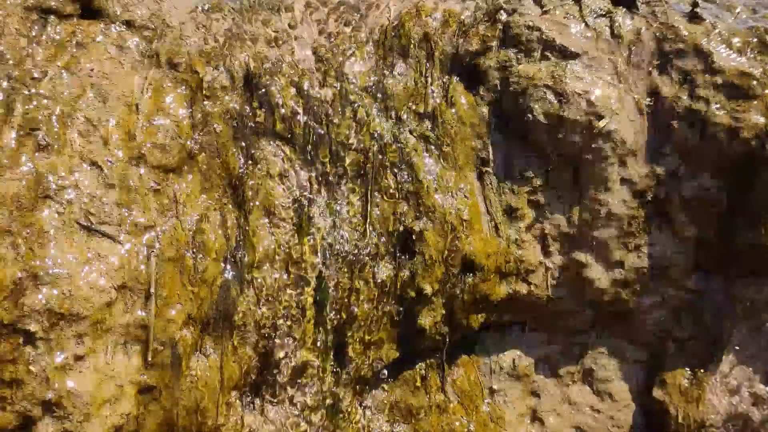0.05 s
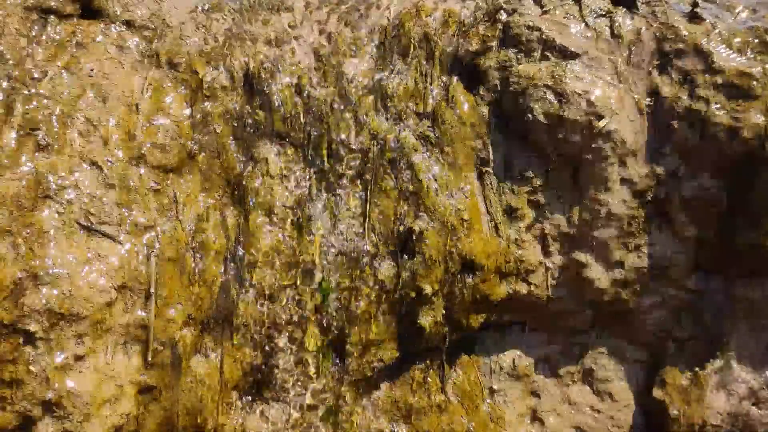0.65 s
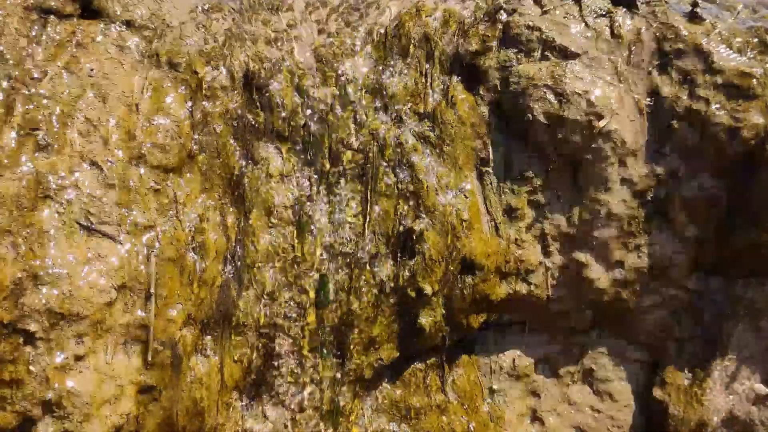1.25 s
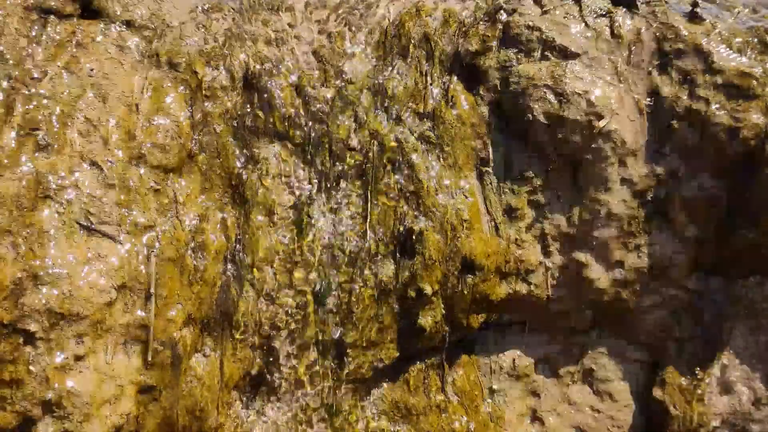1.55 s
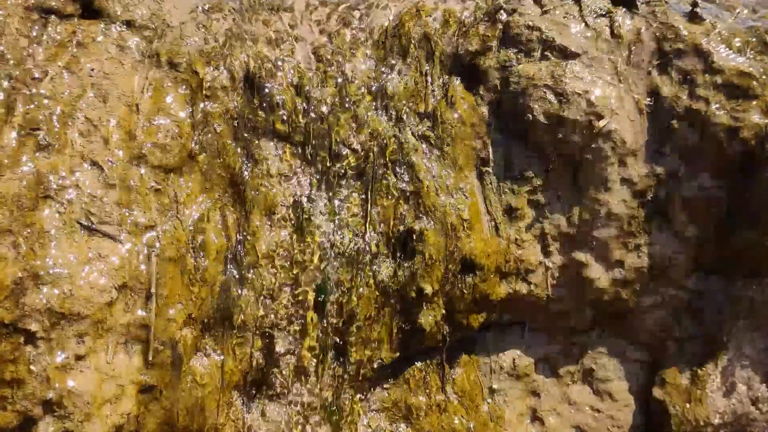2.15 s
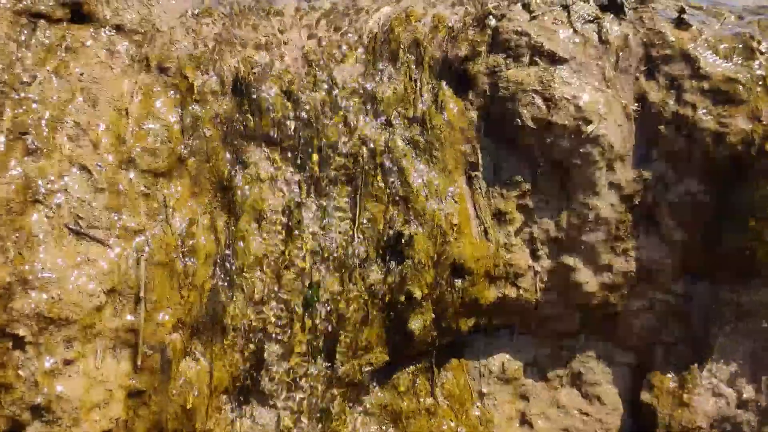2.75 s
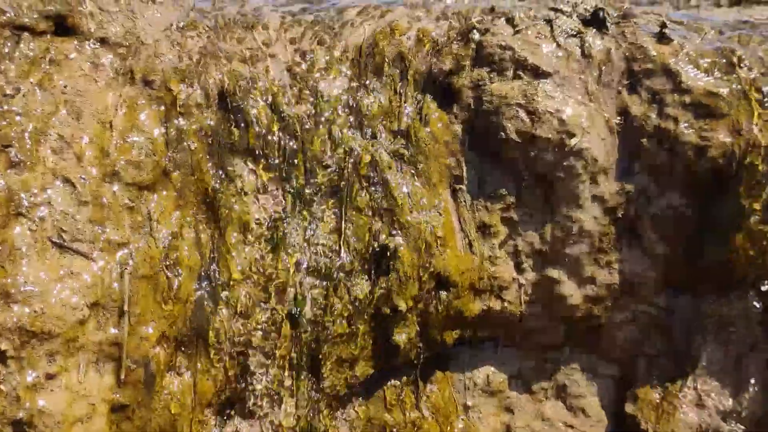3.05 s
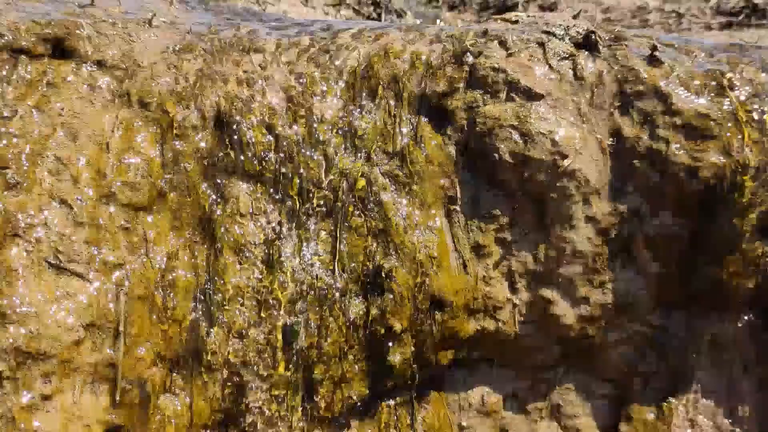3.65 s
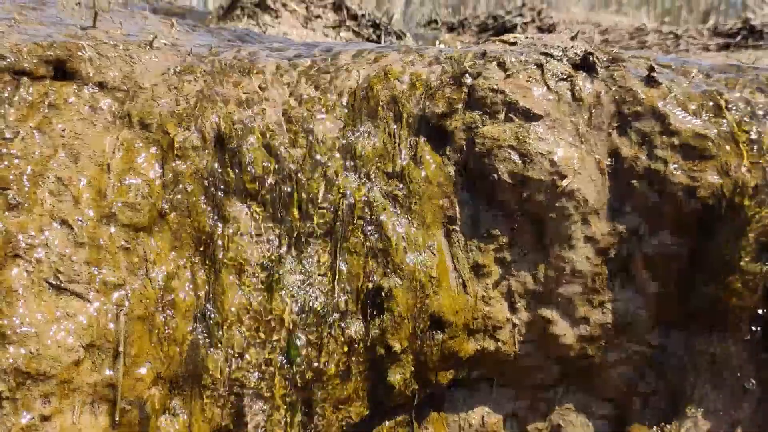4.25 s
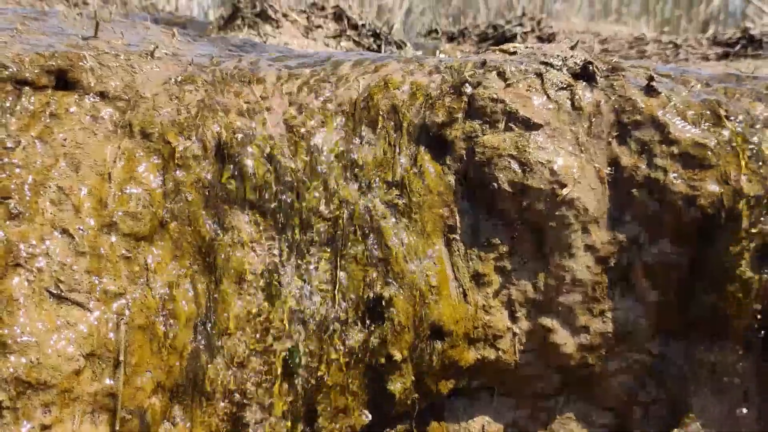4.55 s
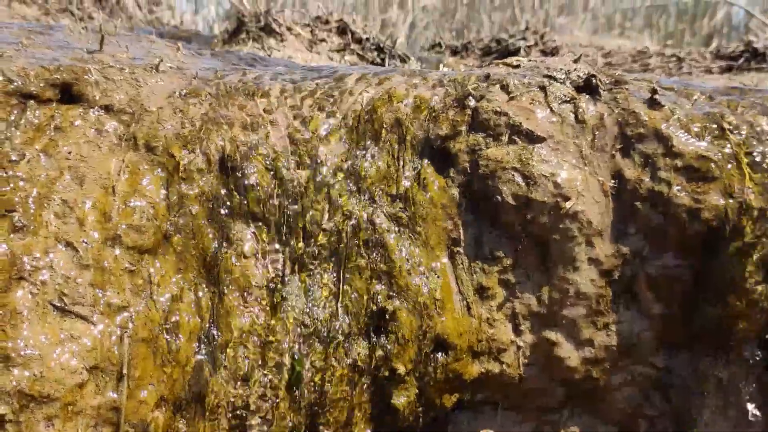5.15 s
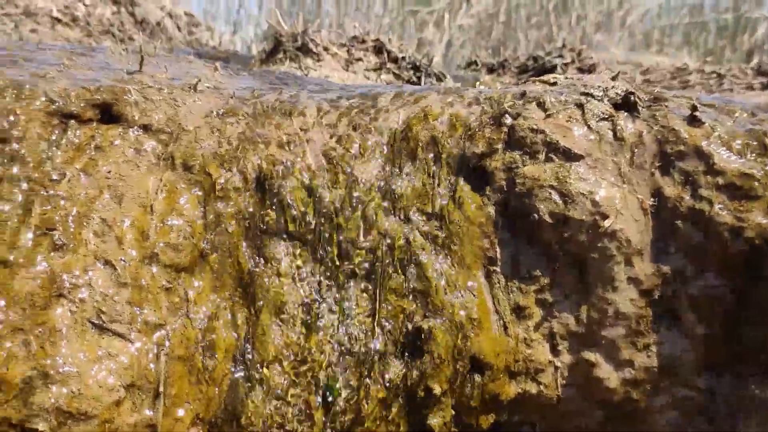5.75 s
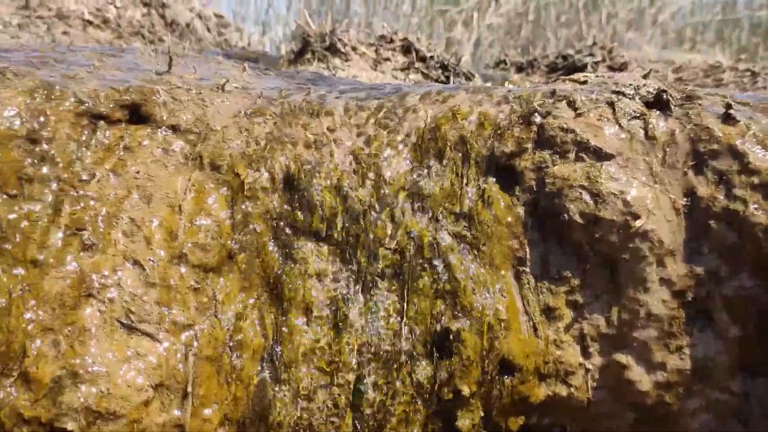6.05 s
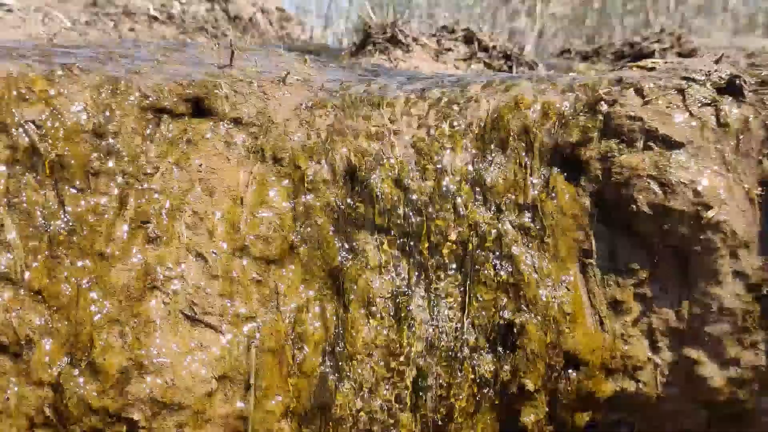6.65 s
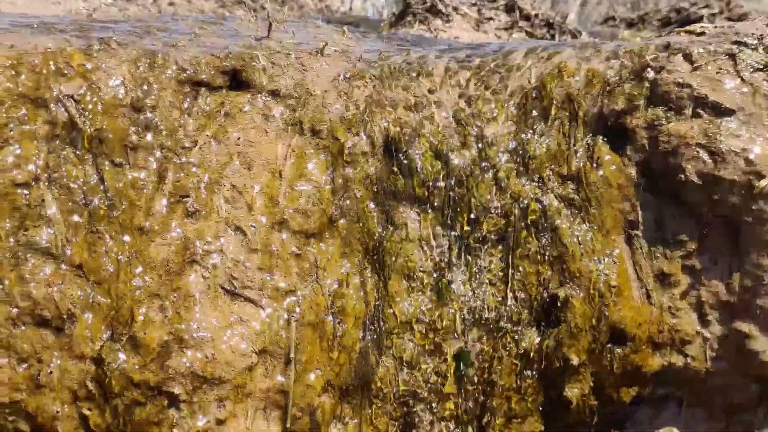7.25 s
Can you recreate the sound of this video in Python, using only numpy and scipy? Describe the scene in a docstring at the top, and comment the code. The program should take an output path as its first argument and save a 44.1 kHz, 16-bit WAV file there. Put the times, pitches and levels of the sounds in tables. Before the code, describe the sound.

Close outdoor trickle of water babbling, dripping and splashing over wet rock, above a faint distant rumble.

```python
"""Outdoors, close to a mossy rock face, a thin fall of water trickles down.
Each big drop traps a bubble that rings for a few cycles and throws a burst of tiny droplets;
others spatter on bare rock. Countless small drops babble and fizz between them, faint glugs come
from the foot of the rock, and froth sizzles near the end. Hollows and ledges add a brief ring,
over a faint distant rumble."""
import sys
import numpy as np
from scipy import signal
from scipy.fft import rfft, irfft
from scipy.io import wavfile
from scipy.ndimage import uniform_filter1d

SR = 44100
rng = np.random.default_rng(int(sys.argv[2]) if len(sys.argv) > 2 else 0)


def digitize_waveform(pressure):
    """Quantize a signal to 16-bit integers and store it at the path in sys.argv[1].

    Rows of a 2-D input are taken as channels; values are limited to [-1, 1].
    """
    field = np.atleast_2d(pressure).T
    bounded = np.clip(field, -1, 1)
    quanta = np.round(bounded * 32767).astype(np.int16)
    wavfile.write(sys.argv[1], SR, quanta)


N = 321930
TIME = np.arange(N) / SR
TOP_HZ = 16050  # ceiling of the treble


def undb(db):
    """Decibels to gain."""
    return 10 ** (np.asarray(db) / 20)


def unit(x):
    """Scale to rms 1."""
    return x / np.sqrt(np.mean(x ** 2))


def along(curve, at):
    """Each further column of a curve, read at given values of its first."""
    axis, *columns = np.transpose(curve)
    return [np.interp(at, axis, column) for column in columns]


def colour(x, points, size=4096):
    """Minimum-phase EQ through (f/Hz, gain/dB) points."""
    hz, db = np.transpose(points)
    grid = np.maximum(np.arange(size // 2 + 1) * SR / size, 1)
    cepstrum = irfft(np.log(undb(np.interp(np.log(grid), np.log(hz), db))))
    cepstrum[1:size // 2] *= 2
    cepstrum[size // 2 + 1:] = 0
    return signal.fftconvolve(x, irfft(np.exp(rfft(cepstrum)))[None], axes=1)[:, :N]


def ride(x, db):
    """Ride the fader so that a texture's running level follows a dB curve."""
    power = uniform_filter1d(np.mean(x ** 2, axis=0), size=9000)
    return x * undb(db) / np.sqrt(np.maximum(power, 1e-18))


# Where the fall stands, brighter when faced: t/s, lead of the left channel/ms, spray f/Hz
BEARING = [(0, 0.07, 4000), (5.9, 0.073, 3070), (6.6, 0.0079, 5180), (7.3, 0.011, 4380)]
def bubbles(s, db, hz, decay_ms, pan_db, swell, scoop_ms, scatter_ms, size):
    """Rings that swell, scoop up to pitch as the cavity closes and die fast; db is taken over 10 ms."""
    scatter, polarity = rng.standard_normal((len(s), 2)).T
    per_ms = SR / 1000
    lead_ms = along(BEARING, s)[0] + scatter_ms * scatter
    start = np.clip(s * SR, 0, N).astype(int)
    index = (start[:, None] + np.arange(size)).ravel()
    rad_per_ms = (2 * np.pi * hz / 1000 * np.sign(polarity))[:, None]
    decay = np.reshape(np.maximum(decay_ms, 0.02), (-1, 1))
    swell = np.reshape(swell, (-1, 1))
    channels = []
    for side in (1, -1):  # left, right
        delay_ms = np.maximum(-side * lead_ms, 0)
        ms = np.maximum(np.arange(size) / per_ms - delay_ms[:, None], 0)
        tone = np.sin(rad_per_ms * (ms - scoop_ms * (1 - np.exp(-2 * ms))))
        ring = (ms / decay) ** swell * np.exp(-np.minimum(ms / decay, 20)) * tone
        pan_gain = np.sqrt(2 / (1 + undb(-2 * side * pan_db)))
        gain = undb(db) * pan_gain * np.sqrt(10 * per_ms / (np.sum(ring ** 2, axis=1) + 1e-12))
        channels.append(np.bincount(index, (ring * gain[:, None]).ravel(), N + size)[:N])
    return np.array(channels)


def spray(s, db, hz, pan_db, spread_s, octaves, cycles, count):
    """Each impact throws a burst of pinging droplets that builds and thins within milliseconds."""
    late, pitch, loud, aside = np.moveaxis(rng.standard_normal((len(s), count, 4)), 2, 0)
    onsets = s[:, None] + spread_s * (0.3 + 0.48 * late + 0.08 * late ** 2)
    weight = undb(2 * loud - 4.5 * np.abs(late))
    weight /= np.sqrt(np.sum(weight ** 2, axis=1, keepdims=True))
    ping_db = db[:, None] + 20 * np.log10(weight)
    ping_pan_db = pan_db[:, None] + 4 * aside
    ping_hz = hz[:, None] * 2 ** (octaves * pitch)
    # droplet sizes are bounded: stray pitches fold back, and only the finest bursts reach the top
    top_hz = np.clip(1.6 * hz, 10500, TOP_HZ)[:, None]
    ping_hz = np.clip(ping_hz, 1200 ** 2 / ping_hz, top_hz ** 2 / ping_hz).ravel()
    decay_ms = np.minimum(1000 * cycles / ping_hz, 0.32)
    return bubbles(onsets.ravel(), ping_db.ravel(), ping_hz, decay_ms, ping_pan_db.ravel(),
                   swell=2, scoop_ms=0.044, scatter_ms=0.028, size=124)


def film(droplets, steady_db, window_s):
    """Hiss of the water sheet, which rises and falls around each burst of droplets."""
    power = uniform_filter1d(np.mean(droplets ** 2, axis=0), size=int(window_s * SR))
    stirred = np.sqrt(np.maximum(uniform_filter1d(power, size=200), 0))
    return rng.standard_normal((2, N)) * (stirred + undb(steady_db)) * undb([[1.2], [-1.2]])


# Hero drops: t/s, relative plop level/dB, bubble f/Hz, decay/ms, relative splash level/dB
DROP_HITS = [(0.003, -44, 1030, 0.31, -44.5), (0.0308, -62, 1630, 0.44, -45),
             (0.0754, -39.5, 3270, 0.3, -33.5), (0.114, -46, 2520, 0.27, -48),
             (0.128, -51, 1750, 0.94, -44), (0.1497, -48, 2700, .35, -60), (0.159, -48, 1520, 0.67, -57),
             (0.171, -47.5, 2920, 0.26, -45), (0.236, -51.5, 1430, 0.48, -46),
             (0.2402, -50.5, 2000, 0.27, -45), (0.273, -52, 3080, 0.51, -36),
             (0.3474, -47.5, 2300, 0.69, -41), (0.373, -53.5, 1720, 1, -57), (0.455, -55, 1700, 0.41, -45),
             (0.467, -61, 1770, 0.34, -40.5), (0.517, -48, 4000, 0.15, -62), (0.555, -45, 2920, 0.43, -38),
             (0.677, -42.5, 1390, 0.84, -39), (0.708, -46.5, 3060, 0.5, -66), (0.794, -54, 2480, 0.17, -43),
             (0.8136, -46, 1360, 0.68, -41), (0.8347, -53.5, 1540, 0.55, -49), (0.883, -43, 1446, 1.2, -43),
             (0.912, -53, 2240, 0.7, -63), (0.9363, -51, 2770, 0.29, -48), (0.9783, -54, 1620, 0.4, -47),
             (0.998, -55, 2750, 0.21, -48), (1.2058, -54, 3140, 0.56, -42),
             (1.2287, -51.5, 1240, 0.37, -44), (1.3718, -51, 2500, 0.48, -42), (1.38, -55, 1750, 0.19, -37),
             (1.4063, -56, 1790, 0.32, -48), (1.43, -52, 2770, .28, -52), (1.446, -50.5, 2780, 0.41, -44),
             (1.465, -48.5, 2270, 0.18, -44), (1.5051, -41, 2040, 0.18, -35.5),
             (1.532, -51, 1200, 0.67, -64), (1.5528, -61, 3080, .3, -38), (1.5944, -46.5, 2520, 0.6, -39),
             (1.6161, -47.5, 1300, 0.48, -73), (1.693, -54.5, 1470, 0.65, -42),
             (1.716, -53, 2440, 0.83, -44), (1.735, -53, 2550, .35, -41), (1.784, -44, 5350, 0.48, -37),
             (1.788, -47, 2450, 0.37, -42), (1.8229, -54, 1560, 0.3, -37.5), (1.87, -51.5, 3100, 0.26, -37),
             (1.9417, -53, 4540, 0.42, -48), (1.968, -50, 2470, 0.9, -45), (1.982, -54, 1450, .7, -49),
             (1.9863, -52, 1380, 0.86, -55), (2.0186, -42.5, 2200, 0.18, -52),
             (2.0528, -53, 2280, 0.43, -43), (2.204, -58, 2370, .5, -47), (2.2488, -58, 2860, .38, -40),
             (2.279, -51, 2270, 0.92, -37.5), (2.3199, -46, 1500, 0.43, -43),
             (2.329, -47.5, 2440, 0.6, -56), (2.351, -54.5, 1550, .4, -54),
             (2.3597, -53.5, 1590, 0.43, -41), (2.4382, -41, 3100, 0.38, -38),
             (2.442, -49.5, 2350, .6, -52), (2.5925, -49.5, 1670, 0.45, -52), (2.6045, -55, 2390, .45, -44),
             (2.659, -45, 2240, 0.18, -40), (2.701, -50, 1470, 0.77, -35.5), (2.7103, -57, 1660, 0.45, -38),
             (2.7412, -51.5, 1440, 0.27, -56), (2.7897, -39, 1450, 0.64, -62),
             (2.812, -56, 1560, 0.93, -37.5), (2.8385, -46.5, 1210, 0.56, -42),
             (2.8404, -42.5, 1480, 0.43, -40), (2.8585, -55, 1710, 0.75, -41),
             (2.869, -44.5, 1530, 0.72, -45), (2.9114, -48.5, 3800, 0.41, -51),
             (2.929, -49, 2960, 0.35, -40), (2.955, -50, 1980, 0.29, -46), (3.06, -41, 1536, 0.67, -41.5),
             (3.1105, -53.5, 1600, 0.65, -53), (3.148, -50.5, 2350, .45, -57),
             (3.1982, -44.5, 1520, 0.51, -60), (3.2405, -46.5, 2280, 0.49, -43),
             (3.284, -47.5, 4000, 0.42, -60), (3.3282, -56.5, 890, 0.52, -42),
             (3.3865, -51.5, 1680, 0.51, -47), (3.415, -52, 2430, 0.4, -41), (3.428, -56, 1530, .65, -41),
             (3.467, -47, 1690, 0.49, -68), (3.503, -58, 2500, 0.52, -35.5),
             (3.5224, -47.5, 1260, 0.94, -34.5), (3.562, -47, 2450, 0.22, -52),
             (3.582, -49.5, 2390, 0.89, -41), (3.6034, -46, 1130, 1.3, -76), (3.6236, -35, 2050, 0.3, -40),
             (3.666, -44, 3300, 0.46, -61), (3.7179, -44.5, 3400, 0.31, -38.5),
             (3.742, -45, 2900, 0.13, -43), (3.829, -45, 1330, 0.66, -35),
             (3.8723, -43.5, 1970, 0.31, -38.5), (3.883, -53, 1530, 0.8, -51),
             (3.9152, -45.5, 3260, 0.26, -40), (3.926, -48.5, 2210, 0.66, -54),
             (3.9474, -37.5, 2120, 0.25, -33), (3.9763, -47, 1760, 0.54, -57),
             (3.998, -48, 1330, 0.37, -59), (4.0235, -47.5, 1660, 1.3, -40),
             (4.045, -46.5, 2000, 0.32, -44), (4.0833, -51, 1230, 0.78, -37.5),
             (4.103, -44.5, 1670, 0.55, -47), (4.1103, -47.5, 1150, 0.65, -58),
             (4.1276, -47.5, 1360, 0.47, -36), (4.184, -44.5, 3180, 0.21, -48), (4.199, -54, 1580, .5, -35),
             (4.2178, -39, 1660, 0.47, -34), (4.2297, -54, 1550, 0.46, -35.5),
             (4.2486, -49.5, 1420, 0.59, -46), (4.2652, -43.5, 2190, 0.11, -37),
             (4.2707, -42, 3200, 0.32, -40), (4.2832, -46, 1360, 0.7, -57),
             (4.348, -47.5, 4000, 0.2, -41.5), (4.365, -52.5, 3210, 0.31, -59),
             (4.4015, -44.5, 1380, 0.39, -39.5), (4.434, -47, 1580, 0.38, -55),
             (4.4645, -46.5, 3320, 0.35, -57), (4.475, -46.5, 1840, 0.23, -46),
             (4.4855, -40.5, 1280, 0.68, -37), (4.5142, -42.5, 1180, 0.8, -34),
             (4.5155, -48, 710, 0.93, -52), (4.5327, -46.5, 3300, 0.57, -38),
             (4.5633, -42.5, 3400, 0.23, -57), (4.5792, -37.5, 4760, 0.19, -38),
             (4.588, -45, 1100, 1.5, -57), (4.6148, -37.5, 3050, 0.39, -45),
             (4.6225, -48.5, 1750, 0.6, -57), (4.646, -50, 3230, 0.21, -56), (4.684, -55.5, 960, 0.67, -63),
             (4.7032, -51.5, 1630, 0.76, -38), (4.7634, -49.5, 2000, 0.33, -37),
             (4.7983, -49.5, 1350, 0.74, -37), (4.8468, -46.5, 4740, 0.29, -64),
             (4.8694, -37.5, 3155, 0.44, -35.5), (4.894, -45, 1580, 0.35, -46),
             (4.917, -40, 1050, 0.32, -42), (4.9395, -51.5, 1630, 0.24, -45),
             (5.0793, -47, 3760, 0.39, -41), (5.0928, -40, 1180, 0.57, -44), (5.1155, -47, 1480, 0.35, -59),
             (5.2075, -51.5, 1560, 0.65, -65), (5.2356, -52.5, 1580, 1.1, -58),
             (5.2815, -50, 1340, 0.53, -60), (5.351, -49, 2570, 0.23, -48), (5.3706, -50, 2370, 0.34, -47),
             (5.395, -51, 2860, 0.72, -44), (5.4205, -51.5, 1485, 0.45, -59), (5.466, -54, 1410, 0.82, -64),
             (5.5242, -44, 1210, 1.6, -41), (5.5535, -42, 4460, 0.15, -47),
             (5.6031, -39.5, 1444, 0.61, -44), (5.613, -49.5, 2970, 0.51, -57),
             (5.635, -56, 1620, 0.89, -41), (5.658, -53, 3160, 0.49, -49), (5.6694, -53, 1450, 1.5, -42),
             (5.697, -48.5, 1500, 0.58, -41), (5.7561, -54, 1850, 0.92, -64),
             (5.7949, -46, 1210, 0.54, -41), (5.797, -44, 3270, 0.2, -57), (5.8, -52, 2480, 0.17, -42.5),
             (5.8339, -50.5, 1600, 0.34, -52), (5.974, -48, 3000, 0.13, -44),
             (6.0145, -46.5, 1360, 0.53, -39.5), (6.0414, -52, 4070, 0.32, -43),
             (6.0705, -54.5, 1840, 0.39, -39), (6.1903, -45.5, 1920, 0.47, -45),
             (6.197, -49, 1630, 0.9, -47), (6.2247, -56, 1660, 1.3, -42), (6.2586, -52, 4300, 0.4, -52),
             (6.2769, -47, 2300, 0.81, -39.5), (6.293, -47.5, 3530, 0.41, -53),
             (6.3, -45.5, 3000, 0.29, -42), (6.3156, -46.5, 4500, 0.25, -58), (6.392, -49, 3560, 0.32, -40),
             (6.4228, -39.5, 3850, 0.17, -61), (6.451, -53.5, 1360, 0.66, -39.5),
             (6.482, -57, 1840, 0.29, -40.5), (6.5036, -54, 2450, 0.31, -35.5),
             (6.552, -52, 880, 0.41, -73), (6.6375, -49.5, 1660, 0.87, -36.5),
             (6.702, -47, 4400, 0.42, -37.5), (6.7154, -51, 2656, 0.26, -42),
             (6.7368, -47.5, 3600, 0.25, -42), (6.7696, -51, 1090, 0.45, -57),
             (6.7892, -49.5, 3250, 0.3, -59), (6.803, -43, 3600, 0.35, -31), (6.887, -57, 1800, 0.24, -54),
             (6.903, -53, 3400, 0.37, -58), (6.9135, -57, 1618, 1, -68), (6.922, -49, 3700, 0.33, -59),
             (6.935, -47, 2410, 0.73, -34.5), (6.9799, -44, 1735, 0.77, -38), (7.0207, -46, 2050, .27, -56),
             (7.0324, -49, 4450, 0.35, -51), (7.07, -44.5, 1660, 0.68, -33), (7.0923, -46, 3300, 0.51, -64),
             (7.0993, -49, 1460, 0.27, -62), (7.111, -58, 4330, 0.42, -50), (7.123, -44.5, 3370, 0.39, -39),
             (7.1788, -44, 4500, 0.36, -49), (7.184, -53.5, 1480, 0.96, -61), (7.214, -37, 4050, 0.27, -33),
             (7.228, -42, 5450, 0.14, -33), (7.253, -53, 3640, 0.28, -45), (7.2655, -46, 2920, 0.48, -52)]
# Deep bubbles sit centre, smaller ones to the left: f/Hz, left minus right/dB
DROP_PANNING = [(1000, 0.5), (1600, 0.5), (2500, 3), (3200, 3), (4500, 1)]
# EQ of the water sheet torn by a big drop: f/Hz, gain/dB
SHEET_EQ = [(500, -17.5), (1400, -14), (3500, -4), (6000, -25.5), (9000, -4), (11000, -15.5), (16000, -19)]
def big_drops():
    """Plops in the water film, each with its splash; small, high bubbles have a softer attack."""
    s, db, hz, decay_ms, spray_db = np.transpose(DROP_HITS)
    pan_db = along(DROP_PANNING, hz)[0] + 1.05 * rng.standard_normal(len(s))
    spray_hz = along(BEARING, s)[1] * 2 ** (0.2 * rng.standard_normal(len(s)))
    swell = np.interp(hz, [1500, 3000], [1.5, 3])
    plops = bubbles(s, db, hz, np.maximum(decay_ms, 0.15), pan_db, swell,
                    scoop_ms=0.13, scatter_ms=0.048, size=700)
    splash = spray(s, spray_db, spray_hz, pan_db / 2 + 0.5,
                   spread_s=0.0042, octaves=0.651, cycles=1.16, count=26)
    sheet = colour(film(splash, steady_db=-50.5, window_s=0.0016), SHEET_EQ)
    return undb(5.5) * plops + undb(-4.5) * splash + undb(-3.5) * sheet


# Fader moves of the trickle, before trims: t/s, babble level/dB, fizz level/dB, mist level/dB
FLOW_FADERS = [(0, -46.5, -54, -61), (0.5, -52.5, -52, -58.2), (0.85, -52, -55.5, -60),
               (1.15, -49.5, -54, -58), (1.5, -49.5, -55.5, -61.5), (1.9, -51.5, -51, -58.5),
               (2.25, -48, -52.5, -63), (2.55, -53, -50.5, -59), (2.8, -49.5, -56, -62),
               (2.95, -51, -53, -53), (3.12, -52, -53.5, -58), (3.29, -50.5, -49.5, -46.5),
               (3.38, -49, -50.5, -61), (3.55, -51, -55.5, -61.5), (3.77, -50, -51.5, -58),
               (4.0, -45.5, -53, -56.5), (4.38, -50.5, -52, -60.5), (4.55, -46.5, -49.5, -56.5),
               (4.75, -49.5, -55.5, -62.5), (5.15, -50, -56.5, -59), (5.65, -48, -56, -61),
               (5.9, -48, -55, -61.5), (6.15, -51.5, -51.5, -59.5), (6.5, -52.5, -54.5, -60.5),
               (7.3, -52, -49.5, -62)]
# EQs of the trickle's layers: f/Hz, gain/dB
BABBLE_EQ = [(300, -14.5), (600, 19.5), (850, -5.5), (1150, 3.5), (1550, 4.5), (1880, 4.5), (2380, 9),
             (2750, 7.5), (3150, 9.5), (3900, 5.5), (5500, 15.5), (9000, -8)]  # bubbles of the small drops
PLINK_EQ = [(1500, -11), (3000, 4), (5000, 8), (6500, -17.5), (9000, 8), (10800, -10), (13000, -13),
            (16000, -44)]  # tiny bubbles ringing on their own
FIZZ_EQ = [(500, 12.5), (1500, -6), (3000, -11), (5000, 1), (6500, 4.5), (8500, 2.5), (9800, -29),
           (10800, -7), (12500, -31)]  # shed droplets
MIST_EQ = [(5000, -69), (9500, 10), (11500, -2.5), (13000, -10), (15300, 1.5), (16500, -13)]  # atomised water
CHURN_EQ = [(400, -31), (900, -12), (1400, -8.5), (2500, -5.5), (3500, -8), (6000, -15.5), (12000, -34)]  # stirred water that fills the gaps
def trickle(count=1700):
    """Small drops at random: each rings a bubble and sheds fizz and mist, over the hiss of the film."""
    babble_db, fizz_db, mist_db = along(FLOW_FADERS, TIME)
    place, pitch, force, tiny = rng.random((count, 4)).T
    ring, aside, trapped, fine, lag = rng.standard_normal((count, 5)).T
    s = (np.arange(count) + 4 * place - 2) / count * N / SR
    db = 15 * force ** 2  # many weak drops, few strong ones
    hz = 1150 * 4 ** pitch ** 1.2
    pan_db = 3 * aside + np.where(hz > 1900, 4, -1.5)
    decay_ms = 0.56 * np.exp(0.057 * ring) * (hz / 2000) ** -0.4
    babble = bubbles(s, 0.77 * db + 2 * trapped, hz, decay_ms, pan_db,
                     swell=3, scoop_ms=0.2, scatter_ms=0.039, size=480)
    # a drop splits into several smaller bubbles
    babble += undb(-8.5) * spray(s, 1.48 * db, 2300 * 2 ** (0.21 * fine), pan_db,
                                 spread_s=0.0054, octaves=0.75, cycles=0.72, count=4)
    # and leaves a tiny one that rings with a clear pitch
    plinks = bubbles(s + 0.002 * lag, db - 2 * trapped, 3000 * 5 ** tiny, 0.26 * np.exp(0.22 * ring),
                     pan_db=3.5 - 4 * aside, swell=3, scoop_ms=0.14, scatter_ms=0.014, size=260)
    droplets = unit(spray(s, db, 7000 * 2 ** (0.5 * fine), 3 * aside + 5.4,
                          spread_s=0.0028, octaves=0.27, cycles=1.94, count=9))
    droplets += undb(-9.5) * film(droplets, steady_db=-25, window_s=0.0025)
    fizz = unit(colour(droplets, FIZZ_EQ)) + undb(-2.5) * unit(colour(plinks, PLINK_EQ))
    # the hardest impacts atomise the most water
    mist = unit(spray(s, 1.04 * db + 2 * fine, np.full(count, 13000), 3 * aside + 3.8,
                      spread_s=0.0023, octaves=0.16, cycles=1.6, count=6))
    churn = film(unit(babble), steady_db=8.5, window_s=0.0025)
    mist += undb(-20) * film(mist, steady_db=1, window_s=0.0032)
    return (ride(colour(babble, BABBLE_EQ), babble_db - 2.5)
            + ride(colour(churn, CHURN_EQ), babble_db - 8.5)
            + ride(fizz, fizz_db + 0.24)
            + ride(colour(mist, MIST_EQ), mist_db + 0.18))


# Accents on bare rock: t/s, relative level/dB, droplet f/Hz
SPATTER_HITS = [(0.274, -31.5, 7100), (0.312, -29, 7960), (0.3305, -40, 9200), (0.336, -35, 7500),
                (0.4555, -34, 6400), (0.472, -35, 6360), (0.553, -34, 10100), (0.5732, -35.5, 8900),
                (0.5825, -34, 8100), (0.832, -42, 11400), (0.943, -34, 7300), (0.9692, -35.5, 7360),
                (0.983, -40, 12900), (1.044, -42, 12500), (1.1, -40, 12700), (1.381, -37, 6500),
                (1.785, -37, 5700), (2.1185, -33.5, 5930), (2.192, -41.5, 11500), (2.47, -37, 10000),
                (2.596, -36.5, 12400), (2.6438, -35, 11000), (2.813, -40, 12700), (2.8515, -31, 7950),
                (2.869, -34, 10500), (2.888, -31.5, 9500), (2.93, -29, 6270), (2.964, -38, 12500),
                (2.986, -41, 13000), (3.018, -29, 5800), (3.061, -45, 12200), (3.1995, -35, 8550),
                (3.238, -48, 12500), (3.2535, -33, 12700), (3.2916, -37, 10200), (3.3067, -32.5, 6500),
                (3.3183, -33, 7300), (3.5011, -31, 6200), (3.519, -40, 11500), (3.849, -37.5, 6740),
                (3.8835, -34, 7500), (4.58, -33, 6300), (4.8485, -34, 6900), (5.0243, -34, 8600),
                (5.081, -31, 7950), (5.216, -30.5, 9050), (5.4297, -33.5, 9000), (5.555, -41, 11000),
                (5.943, -34, 7200), (6.138, -33, 7050), (6.52, -37, 6440), (6.565, -35, 6560),
                (6.601, -33, 6350), (6.749, -30, 6900), (6.898, -36, 7100), (6.921, -33.5, 5200),
                (6.9505, -30.5, 7540), (6.981, -35.5, 9800), (7.137, -36, 6850), (7.1555, -31, 5200),
                (7.1705, -29, 5750), (7.195, -40, 5000)]
def spatters(fills=44):
    """Drops burst bright and dry with no big bubble; weaker random fills follow the fizz fader."""
    weak, place, pitch = rng.random((fills, 3)).T
    fill_s = (np.arange(fills) + place) / fills * N / SR
    fill_db = along(FLOW_FADERS, fill_s)[1] + 15.5 - 7 * weak
    fill_hz = 7050 * 2 ** (pitch - 0.5)
    s, db, hz = np.hstack([np.transpose(SPATTER_HITS), [fill_s, fill_db, fill_hz]])
    pan_db = 3 + 3 * rng.standard_normal(len(s))  # leaning left
    return undb(-10) * spray(s, db, hz, pan_db, spread_s=0.0028, octaves=0.26, cycles=0.8, count=22)


# Froth fades in as the fall is faced: t/s, level of a typical bubble/dB
FROTH_FADER = [(6.149, -76), (6.45, -63), (6.8, -64), (7.3, -61)]
def froth(count=560, centre_hz=4330, octaves=0.497, cycles=0.75):
    """A crowd of small bubbles sizzles wetly."""
    pitch, force, ring, aside = rng.standard_normal((count, 4)).T
    s = rng.uniform(FROTH_FADER[0][0], FROTH_FADER[-1][0], count)
    db = along(FROTH_FADER, s)[0] + 3 * force
    hz = centre_hz * 2 ** (octaves * pitch)
    decay_ms = 1000 * cycles / hz * np.exp(0.25 * ring)
    return bubbles(s, db, hz, decay_ms, pan_db=1.3 + 3 * aside,
                   swell=3, scoop_ms=0.1, scatter_ms=0.028, size=300)


# Swells and lulls of the gurgling: t/s, level/dB
GURGLE_FADER = [(0, -75), (.5, -82), (.8, -68.5), (1.1, -71), (1.45, -65.5), (1.85, -70), (2.2, -67),
                (2.55, -83), (2.8, -71), (3.1, -71.5), (3.7, -79), (4.15, -72), (4.5, -61), (4.95, -73),
                (5.15, -77), (5.4, -62), (6.0, -74), (6.3, -87), (6.8, -74), (7.3, -67.5)]
def gurgles(count=400):
    """Large, faint bubbles glug at the foot of the rock."""
    place, pitch, force = rng.random((count, 3)).T
    s = (np.arange(count) + 2 * place - 1) / count * N / SR
    glugs = bubbles(s, db=9 * force, hz=480 * 2 ** pitch, decay_ms=1.7, pan_db=0,
                    swell=1.5, scoop_ms=0.38, scatter_ms=0.071, size=800)
    return ride(glugs, along(GURGLE_FADER, TIME)[0])


# Resonances of the hollows in the rock: f/Hz, bandwidth/Hz, gain/dB
HOLLOW_MODES = [(1560, 250, -8.5), (2400, 340, -14.5), (3200, 650, -18)]
def hollows(water, turns=110, detune=0.018):
    """The hollows ring with the splashes; their pitch wanders as they fill and drain."""
    fill = np.interp(TIME, np.linspace(0, N / SR, turns), rng.uniform(-0.5, 1, turns))
    ringing = 0
    for tuning in (-1, 0, 1):  # crossfade between flat, centred and sharp
        send = water * np.maximum(1 - np.abs(fill - tuning), 0)
        for hz, width, db in HOLLOW_MODES:
            resonator = signal.iirpeak(hz * (1 + detune * tuning), hz / width, fs=SR)
            ringing += undb(db) * signal.lfilter(*resonator, send)
    return ringing


def ledges(water, peak_s=0.0029, size=768):
    """A short scatter off the ledges; drops land in ever new places, so the echo never repeats."""
    starts = np.arange(0, N, size // 2)
    padded = np.pad(water, ((0, 0), (0, size)))
    grains = padded[:, starts[:, None] + np.arange(size)] * signal.windows.cosine(size)
    t = TIME[:size]
    echoes = rng.standard_normal(grains.shape) * t * np.exp(-t / peak_s)
    echoes /= np.sqrt(np.sum(echoes ** 2, axis=2, keepdims=True))
    wet_grains = signal.fftconvolve(grains, echoes, axes=2)
    index = (starts[:, None] + np.arange(2 * size - 1)).ravel()
    return np.array([np.bincount(index, side.ravel())[:N] for side in wet_grains])


def rock(water):
    """The direct water, plus the ring of the hollows and the echo of the ledges."""
    # low cut: drops are far too small to radiate bass
    water = signal.sosfilt(signal.butter(3, 460, "high", fs=SR, output="sos"), water)
    ringing = hollows(water)
    # small ledges scatter the treble best
    scattered = colour(water, [(1200, -22), (3000, -10.5), (8000, -13)])
    return undb(-4.5) * water + ringing + ledges(scattered + undb(-2.5) * ringing)


# Tone of the distant bed: f/Hz, gain/dB
RUMBLE_EQ = [(20, -14), (40, -19), (60, -5), (80, -1.5), (105, 4), (135, 2), (200, -2.5), (280, -8.5),
             (400, -9), (620, -15.5), (850, -17.5), (1500, -19.5), (4000, -31.5)]
# Its slow swells: t/s, relative level/dB
RUMBLE_FADER = [(0, -77), (.8, -79.5), (1.6, -74), (3, -78), (4.2, -77), (5.5, -77.5), (7.3, -78)]
def rumble():
    """Faint far-off outdoor noise, narrow in the bass and wider above."""
    mid, side = colour(rng.standard_normal((2, N)), RUMBLE_EQ)
    side = colour(side[None], [(30, -3), (80, -9.5), (150, -9.5), (300, 0.5), (600, 1.5), (2000, -2)])
    air = unit(mid + side * np.array([[1], [-1]])) * undb([[0.5], [-0.5]])
    return air * undb(along(RUMBLE_FADER, TIME)[0] + 6.5)


def scene():
    """Water on the rock, in open air."""
    return rock(big_drops() + spatters() + trickle() + froth() + gurgles()) + rumble()


# How the two microphone ports differ: f/Hz, left minus right/dB
PORT_BALANCE = [(100, 1), (450, -1), (660, 1), (880, 2), (1250, -1.5), (1550, -1), (1780, -3.5),
                (2200, 3.3), (2700, 1.5), (4200, .5), (5600, -4), (6900, 0), (9000, 3.5), (11300, -5),
                (12700, 0.8), (14300, 3.5), (16000, 5.5)]
# Microphone tone, bright with a notch in the treble: f/Hz, gain/dB
MICROPHONE_EQ = [(100, -2), (1600, 1.2), (2000, 1.5), (2600, 1), (3400, 1.5), (4000, 1.14), (5100, 1.9),
                 (6300, 3), (7200, 3.5), (9700, 3.5), (10800, -1.5), (12200, 9), (16000, 8)]
def record(dry):
    """Each port adds its own colour; then the shared microphone EQ and a steep high cut."""
    hz, db = np.transpose(PORT_BALANCE)
    left = colour(dry[:1], np.transpose([hz, db / 2]))
    right = colour(dry[1:], np.transpose([hz, -db / 2]))
    high_cut = signal.ellip(10, 0.2, 70, TOP_HZ, fs=SR, output="sos")
    return signal.sosfilt(high_cut, colour(np.vstack([left, right]), MICROPHONE_EQ))


dry = scene()
out = record(dry)
digitize_waveform(out)
```